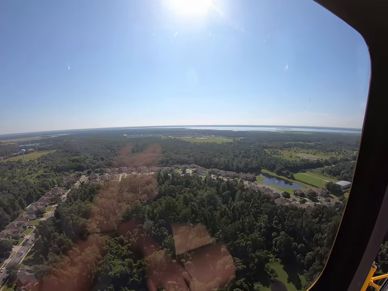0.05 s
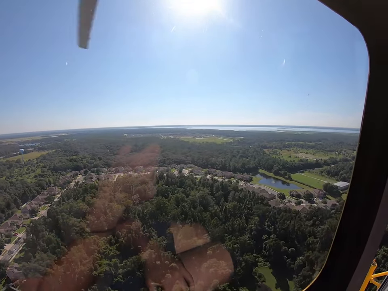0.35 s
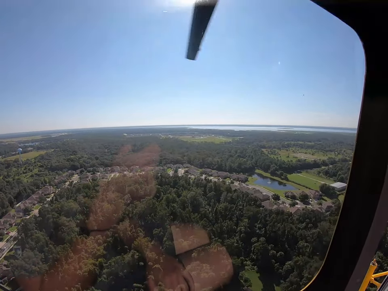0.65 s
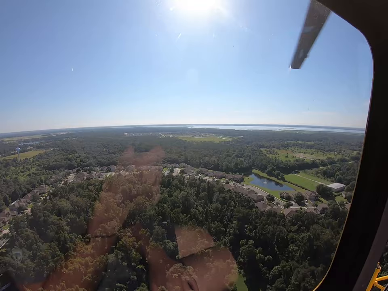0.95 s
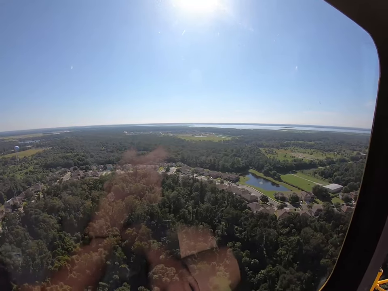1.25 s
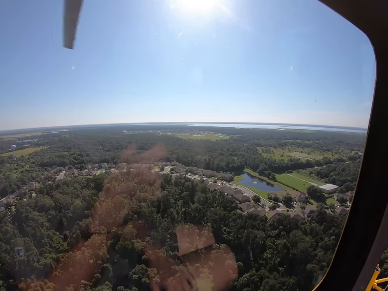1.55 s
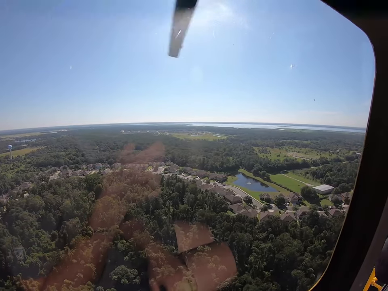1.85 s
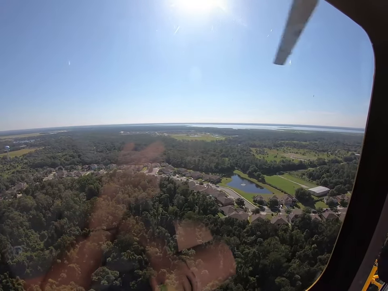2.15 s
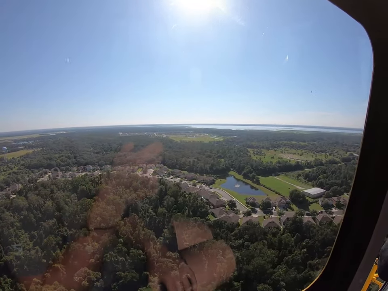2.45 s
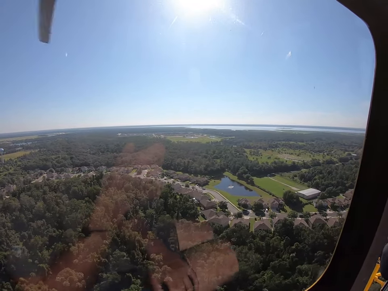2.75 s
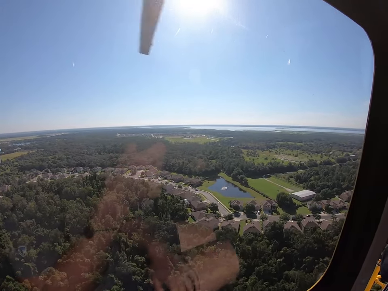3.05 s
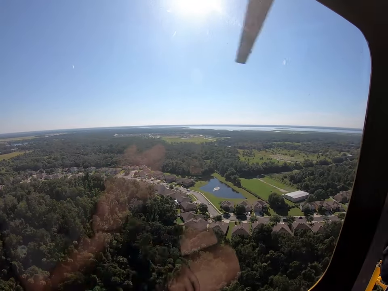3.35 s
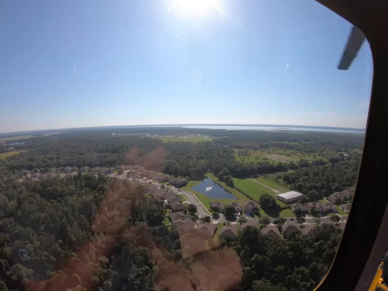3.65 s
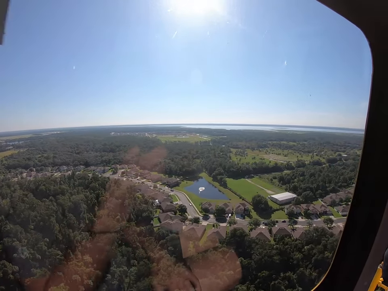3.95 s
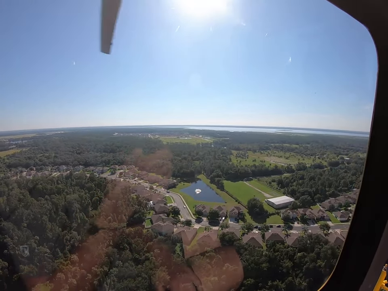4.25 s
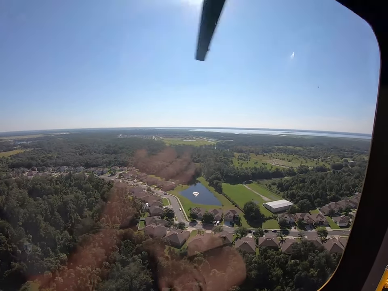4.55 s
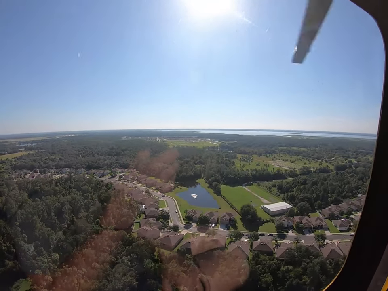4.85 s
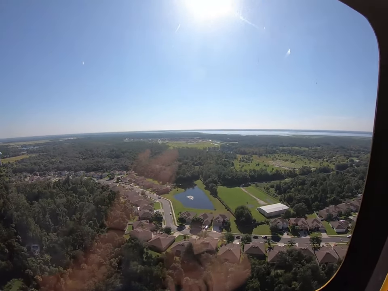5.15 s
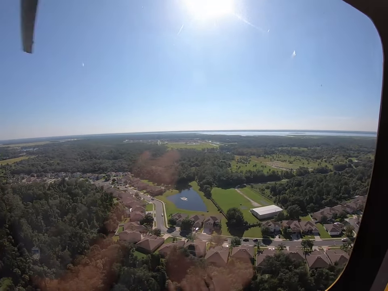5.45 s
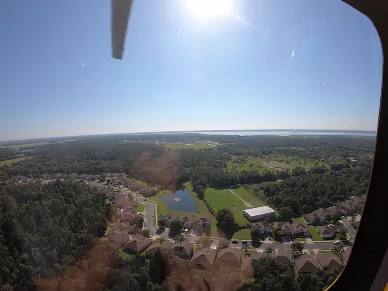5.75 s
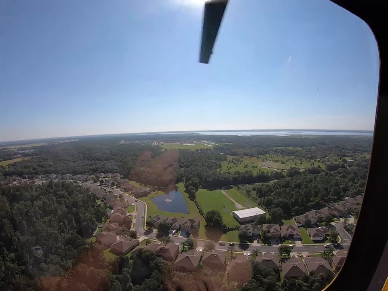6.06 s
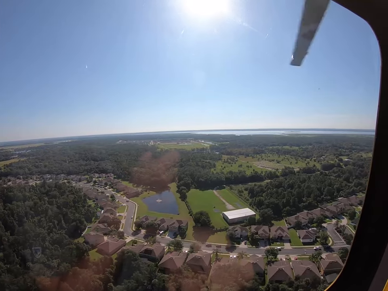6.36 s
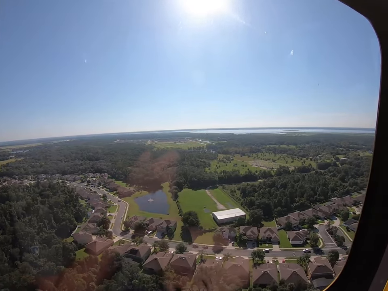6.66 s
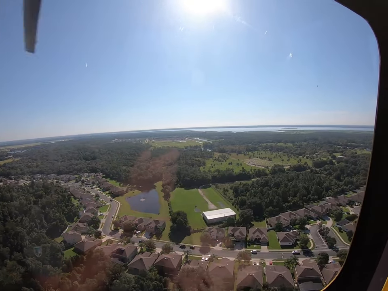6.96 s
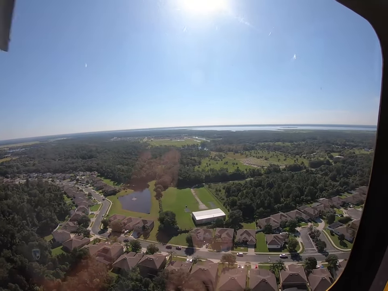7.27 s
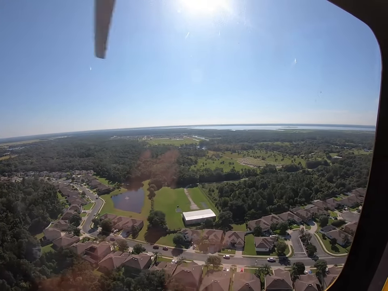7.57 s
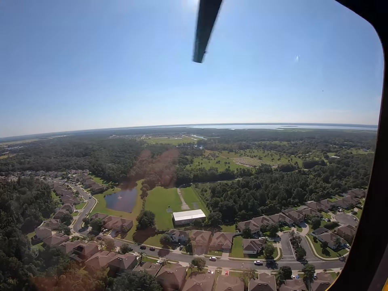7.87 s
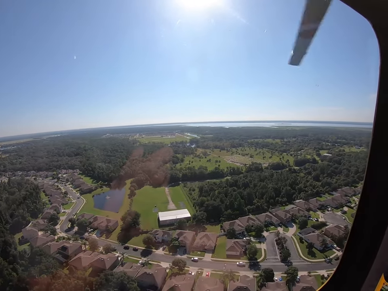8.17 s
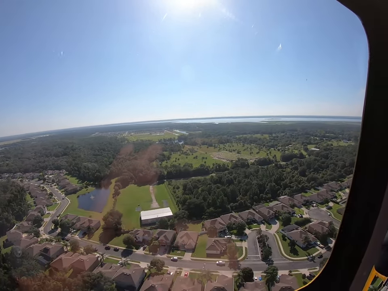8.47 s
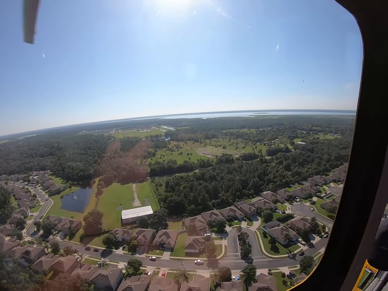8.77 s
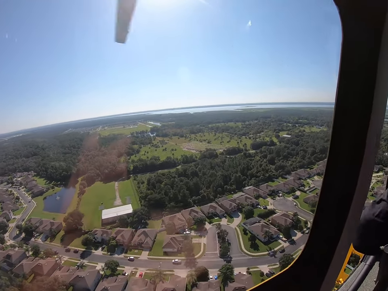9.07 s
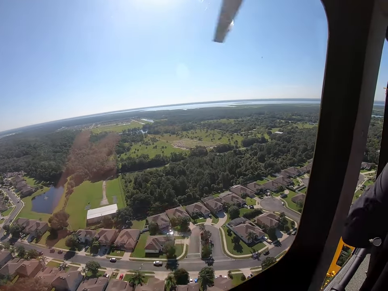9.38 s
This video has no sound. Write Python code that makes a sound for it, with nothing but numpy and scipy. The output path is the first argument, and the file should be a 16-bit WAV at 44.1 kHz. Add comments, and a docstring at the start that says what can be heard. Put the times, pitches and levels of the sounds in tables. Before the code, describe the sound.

Inside a helicopter cabin in flight, a piston engine makes a heavy, low drone over a booming rumble and the throb of the rotor. A strong, steady gearbox whine sits above it, with thinner high whines that waver, swell and fade gently. A muffled engine roar and a faint hiss of air pulse with the blades. The sound runs on unbroken, close around a stereo microphone.

```python
"""A piston engine's drone, with rotor throb and gear whine, from a stereo microphone inside a helicopter.
One slowly drifting shaft speed drives the six cylinders, the rotors and the gearbox, and all their tones
waver once per rotor turn. At the microphone the whines swell and fade as the speed slides them over the
cabin's resonances and as level flight eases into a bank. Under them the cabin booms, the engine bay
roars through the bulkhead and air rushes past the windows, all pulsing with the blades."""
import sys
import numpy as np
from scipy.fft import rfft, irfft, next_fast_len
from scipy.io import wavfile
from scipy.ndimage import uniform_filter1d, minimum_filter1d, map_coordinates

SR = 44100
rng = np.random.default_rng(int(sys.argv[2]) if len(sys.argv) > 2 else 0)


def digitize_waveform(pressure):
    """Quantize a signal to 16-bit integers and store it at the path in sys.argv[1].

    Rows of a 2-D input are taken as channels; values are limited to [-1, 1].
    """
    field = np.atleast_2d(pressure).T
    bounded = np.clip(field, -1, 1)
    quanta = np.round(bounded * 32767).astype(np.int16)
    wavfile.write(sys.argv[1], SR, quanta)


N = 424241
T = np.arange(N) / SR

# engine shaft speed: time_s, speed_hz
SHAFT_SPEED = [(0.0, 52.0), (0.25, 52.067), (0.75, 52.331), (1.1, 52.421), (2.0, 52.31), (2.8, 52.479),
               (3.4, 52.569), (4.4, 52.51), (5.1, 52.8), (7.05, 52.78), (7.6, 52.62), (8.2, 52.49),
               (8.6, 52.543), (9.05, 52.38), (9.62, 52.42)]
# strong engine orders: cycles_per_two_turns, level_db
ENGINE_ORDERS = [(4, -35.5), (5, -37), (6, -17.5), (7, -35.5), (8, -39.5), (9, -29), (10, -28), (12, -33.5),
                 (13, -37.5), (14, -47.5), (15, -29), (16, -40), (18, -36.5), (20, -42), (21, -39.5),
                 (28, -44.5), (31, -46), (32, -39), (34, -40), (36, -47.5), (38, -43), (40, -45.5),
                 (43, -51.5), (45, -43), (46, -49.5), (50, -49.5)]
# the faint orders between them: pitch_hz, level_db
FAINT_ORDERS = [(250, -52), (600, -49.5), (1200, -50.5), (1500, -58), (2000, -61.5), (2600, -65),
                (3400, -71), (4200, -91)]
# main rotor throb, at three times the blade rate: time_s, level_db
ROTOR_THROB = [(0.0, -25), (1.5, -27), (2.7, -30), (4.0, -30), (4.8, -21), (5.7, -24), (6.6, -23),
               (8.2, -30.5), (9.62, -22.5)]
# other main and tail rotor tones: cycles_per_shaft_turn, level_db
BLADE_TONES = [(.30246, -43), (1.378, -28.5), (1.401, -26)]
# main gear mesh tone, following the drive train's load: time_s, level_db, left_minus_right_db
MESH_LOAD = [(0.0, -20, -1), (0.6, -19.5, -0.5), (1.35, -21.5, -4), (2.25, -19.5, -2.5), (3.0, -20, -2.8),
             (4.0, -19.5, -2.6), (6.5, -22, -4.5), (8.1, -22.5, -3.5), (9.62, -21, -3.8)]
# gear and accessory whines: cycles_per_shaft_turn
GEAR_ORDERS = [36, 41, 44, 50, 53, 54, 55, 60, 66, 73.5, 74, 76.5, 77, 88, 91, 99, 108, 109, 111, 132, 143]
# each whine's standing wave at the microphone, around cruise speed (bend < 0 on a resonance, > 0 in a node):
# left_db, right_db, left_slope_db_per_hz, right_slope_db_per_hz, bend_db_per_hz2, bank_db
WHINE_WAVES = [(-47, -53.5, 4.5, 9, 1.5, 1), (-53, -57.5, -13, -6, 10, -2),
               (-45.5, -49.5, 18, -7.5, 7, 1.5), (-51.5, -55.5, -20.5, -13, 12.5, 0.5),
               (-51, -57.5, -4.5, -5, -1, -5), (-50, -45.5, 7, 7.5, 32, 2), (-44.5, -49.5, 9, 7.5, 3, -1),
               (-52.5, -54.5, 29.5, 0.5, 12, 1.5), (-60.5, -58, 5, 5.5, 42, -1),
               (-49.5, -49.5, -2.5, -1, -28, 3), (-53, -56, 6, 5, 26, 3), (-58.5, -57.5, 4, 4, 6, 2),
               (-57, -56.5, -8, -2, -16, 1), (-49.5, -54, -0.5, -12.5, -11.5, -2.5),
               (-56.5, -61.0, -12, -4.5, -5, -1), (-55.5, -67, -1, -3, 3, 1),
               (-49.5, -56, -13, -9, -21.5, -3.5), (-58, -58.5, -7.5, 6, 16, 0),
               (-59.0, -62, 11.5, 7, -4, 0), (-62.5, -63.5, -10, -7, -10, 2), (-58, -68, -6, 9, 6, 0)]
# standing waves of the mesh's second and third harmonics: same columns
SECOND_WAVE = (-42.5, -31, -9, 0, -2, 2.5)
THIRD_WAVE = (-38.5, -30, 0, 7, 21.5, 0)
# easing into the bank: time_s, bank_share
BANKING = [(7.6, 0), (9.0, 1)]
# cabin boom, all around the microphone: frequency_hz, density_db
BOOM_SPECTRUM = [(8, -53), (18, -53), (27, -41.5), (38, -39.5), (48, -48), (58, -35.5), (71, -34.5),
                 (88, -37.5), (125, -41.5), (200, -50), (270, -56), (480, -55), (620, -63.5), (1200, -110)]
# engine bay, behind the bulkhead: frequency_hz, density_db
BAY_SPECTRUM = [(300, -90.5), (620, -59.5), (980, -58), (1080, -60.5), (1170, -57), (1350, -65),
                (1450, -60), (1650, -66), (2150, -67.5), (2450, -73.5), (2850, -73), (3700, -76),
                (4300, -83.5), (7000, -105)]
# air, just outside the windows: frequency_hz, density_db
AIR_SPECTRUM = [(800, -90), (4200, -81), (5000, -79.5), (6500, -82), (8200, -83.5), (10300, -86.5),
                (10800, -93.5), (11500, -102), (13900, -107), (14700, -118)]
# likeness of the noise at the microphone's two sides: frequency_hz, correlation
STEREO_LIKENESS = [(100, 0.97), (250, 1), (480, 1), (700, -0.58), (1200, -0.18), (1700, 0.14), (3400, 0.36),
                   (5000, 0.28), (7000, -0.083)]

CRUISE_HZ, ROTOR_PER_SHAFT_TURN = 52.53, .10082
BLADES, GEAR_TEETH = 3, 11


def amp(db):
    """Decibels to gain."""
    return np.exp(np.asarray(db) * (np.log(10) / 20))


def along(points, hz):
    """(Hz, value) points read on a log axis."""
    f, v = np.transpose(points)
    return np.interp(np.log(hz + 1), np.log(f + 1), v)


def curves(rows):
    """One value per sample for each column after the time."""
    times, *columns = np.transpose(rows)
    return [np.interp(T, times, column) for column in columns]


def wobble(rate):
    """A smooth random curve with rate knots a second."""
    coarse = np.linspace(0, T[-1], 2000)
    knots = rng.standard_normal(400)
    return np.interp(T, coarse, map_coordinates(knots, [coarse * rate], mode="mirror"))


def panned(db):
    """Left and right gains of constant power for a level difference."""
    gains = amp(np.array([db, -db]) / 2).reshape(2, -1)
    return gains / np.sqrt(np.mean(gains ** 2, axis=0))


def cycle(turns):
    """A sine that runs once per turn."""
    return np.sin((2 * np.pi * (turns - np.floor(turns))).astype(np.float32))


def tone(turns, drift_db, flutter_db, spread, lag=0):
    """A fluttering tone; each side drifts in level and phase. Spread and right-side lag are in cycles."""
    phase = turns + rng.random()
    flutter = flutter_db * wobble(14)
    return np.array([amp(flutter + drift_db * wobble(1.226))
                     * cycle(phase - side * lag + spread * wobble(0.388)) for side in range(2)])


def rush(spectrum):
    """Stereo noise with the given power per Hz, nearly alike on both sides in the bass."""
    size = next_fast_len(N + SR // 4)
    hz = np.fft.rfftfreq(size, 1 / SR)
    width = np.arccos(np.clip(along(STEREO_LIKENESS, hz), -1, 1)) / 2
    gain = amp(along(spectrum, hz)) * np.sqrt(SR / 2) * np.array([np.cos(width), np.sin(width)])
    mid, side = irfft(rfft(rng.standard_normal((2, size))) * gain, size)[:, :N]
    return np.array([mid + side, mid - side])


def engine_drone(shaft, speed, load_db):
    """Four-stroke exhaust, led by six firings per two turns: brighter under load, softer at speed."""
    drone = np.zeros((2, N))
    for order, db in ENGINE_ORDERS:
        bright_db = 0.61 * min(order / 59, 1) * load_db
        partial = tone(order * shaft / 2, drift_db=0.7, flutter_db=0.5, spread=0.0044 * order)
        drone += amp(db + bright_db) * partial
    return drone * amp(-1.5 * (speed - CRUISE_HZ))


def engine_clatter(shaft):
    """A comb of faint orders between the strong ones, repeating with each four-stroke cycle."""
    size = 8192
    orders = np.arange(size // 2 + 1)
    hz = orders * CRUISE_HZ / 2
    faint = (hz > FAINT_ORDERS[0][0]) & (hz < FAINT_ORDERS[-1][0]) & (orders % GEAR_TEETH > 0)
    faint &= ~np.isin(orders, np.transpose(ENGINE_ORDERS)[0])
    # each order reaches each side of the microphone with its own strength and delay
    level = faint * amp(along(FAINT_ORDERS, hz) + 2.1 * rng.standard_normal((2, len(hz))))
    phase = rng.random(len(hz)) + 0.13 * rng.standard_normal((2, len(hz)))
    one_cycle = irfft(level * np.exp(2j * np.pi * phase)) * size / 2
    position = (shaft / 2) % 1 * size
    clatter = np.array([np.interp(position, np.arange(size), side) for side in one_cycle])
    return clatter * amp(0.52 * wobble(9.3))


def rotors(shaft):
    """Low blade tones from overhead and the tail: the throb swells and fades, two close tones beat."""
    throb_db, = curves(ROTOR_THROB)
    tones = [(3 * BLADES * ROTOR_PER_SHAFT_TURN, throb_db)] + BLADE_TONES
    return sum(amp(db) * tone(order * shaft, drift_db=0.8, flutter_db=1.0, spread=.01)
               for order, db in tones)


def standing_wave(speed, bank, left_db, right_db, left_slope, right_slope, bend, bank_db):
    """A tone's gain at the microphone as it slides over cabin resonances and the helicopter banks."""
    off_hz = speed - CRUISE_HZ
    sides_db = np.array([left_db + left_slope * off_hz, right_db + right_slope * off_hz])
    return amp(sides_db + bend * off_hz ** 2 + bank_db * bank)


def main_gear(shaft, rotor, speed, bank, mesh_db, pan_db):
    """Meshing teeth sing in three harmonics, pulsing with the load from the rotor and the engine."""
    mesh = GEAR_TEETH * shaft
    blade, stroke = cycle(BLADES * rotor), cycle(shaft / 2)
    first = tone(mesh, drift_db=0.6, flutter_db=0.38, spread=0.017)
    first *= amp(mesh_db + 0.62) * panned(pan_db) * (1 + 0.068 * blade)
    second = tone(2 * mesh, drift_db=2.6, flutter_db=2.2, spread=0.066, lag=.32)
    second *= standing_wave(speed, bank, *SECOND_WAVE) * (1 + .32 * blade + 0.25 * stroke)
    third = tone(3 * mesh, drift_db=0.5, flutter_db=1.17, spread=0.028)
    third *= standing_wave(speed, bank, *THIRD_WAVE)
    third *= 1 + 0.049 * cycle(rotor) + 0.12 * stroke + 0.1 * cycle(shaft)
    return first + second + third


def gear_whines(shaft, rotor, speed, bank):
    """High gear tones swell and fade with speed and bank, pulsing with the blades and engine cycle."""
    whines = np.zeros((2, N))
    for order, wave in zip(GEAR_ORDERS, WHINE_WAVES):
        blade_phase, stroke_phase = rng.random(2)
        load = 1 + 0.19 * cycle(BLADES * rotor + blade_phase) + 0.087 * cycle(shaft / 2 + stroke_phase)
        whine = tone(order * shaft, drift_db=0.3, flutter_db=1.3, spread=0.05)
        whines += standing_wave(speed, bank, *wave) * load * whine
    return whines


def cabin_boom(rotor):
    """The cabin rumbles around the microphone, pulsing gently with each blade and rotor turn."""
    pulse = 1 + 0.035 * cycle(BLADES * rotor) + 0.047 * cycle(rotor)
    return rush(BOOM_SPECTRUM) * pulse * amp(0.23 * wobble(3.05)) * panned(-0.8)


def engine_bay(shaft, rotor):
    """Midrange noise comes through the bulkhead, pulsing with the blades, the shaft and the firings."""
    pulse = 1 + 0.13 * cycle(BLADES * rotor) + 0.054 * cycle(shaft) + 0.038 * cycle(3 * shaft)
    return rush(BAY_SPECTRUM) * pulse * amp(0.45 * wobble(6)) * panned(0.53)


def window_air(rotor):
    """Air hisses past the nearby windows, pulsing with each blade and rotor turn."""
    pulse = 1 - 0.16 * cycle(BLADES * rotor) + 0.072 * cycle(rotor)
    return rush(AIR_SPECTRUM) * pulse * amp(.3 * wobble(5.6)) * panned(-.7)


def scene():
    """The drive train's tones over the rushing noise, as they reach the microphone in the cabin."""
    speed, = curves(SHAFT_SPEED)
    bank, = curves(BANKING)
    mesh_db, pan_db = curves(MESH_LOAD)
    turns = np.cumsum(speed) / SR
    rotor = ROTOR_PER_SHAFT_TURN * turns
    # the rotor's uneven drag twists the drive train back and forth once per rotor turn
    twist = 0.0019 * cycle(rotor) * (1 + 0.18 * wobble(0.91))
    shaft = turns - twist + 0.00025 * wobble(23)
    tones = rotors(shaft) + engine_drone(shaft, speed, mesh_db - mesh_db.mean()) + engine_clatter(shaft)
    tones += main_gear(shaft, rotor, speed, bank, mesh_db, pan_db)
    tones += gear_whines(shaft, rotor, speed, bank)
    return np.sqrt(2) * tones + cabin_boom(rotor) + engine_bay(shaft, rotor) + window_air(rotor)


def record(dry):
    """A limiter after the microphone ducks the highest crests; nothing passes above the band limit."""
    ceiling, top_hz = .78, 14800
    needed = ceiling / np.maximum(np.abs(dry).max(axis=0), ceiling)
    gain = uniform_filter1d(minimum_filter1d(needed, size=900), size=600)
    size = next_fast_len(N + SR // 4)
    passband = np.fft.rfftfreq(size, 1 / SR) < top_hz
    return irfft(rfft(dry * gain, size) * passband, size)[:, :N]


dry = scene()
out = record(dry)
digitize_waveform(out)
```